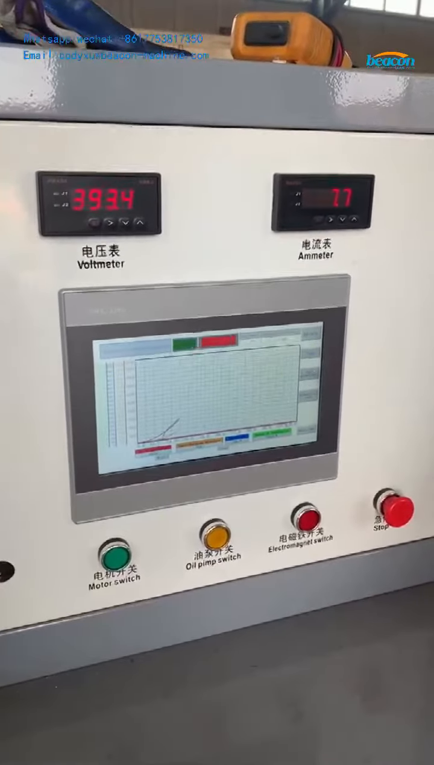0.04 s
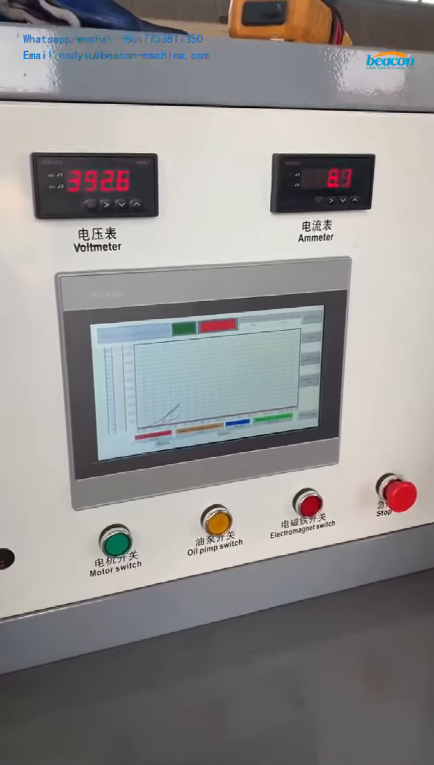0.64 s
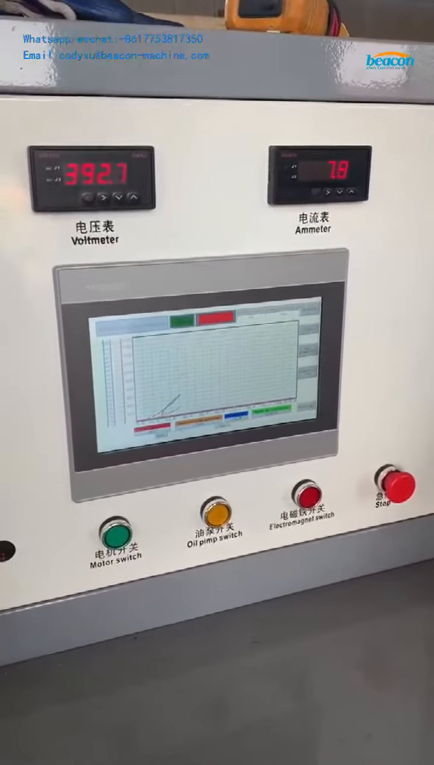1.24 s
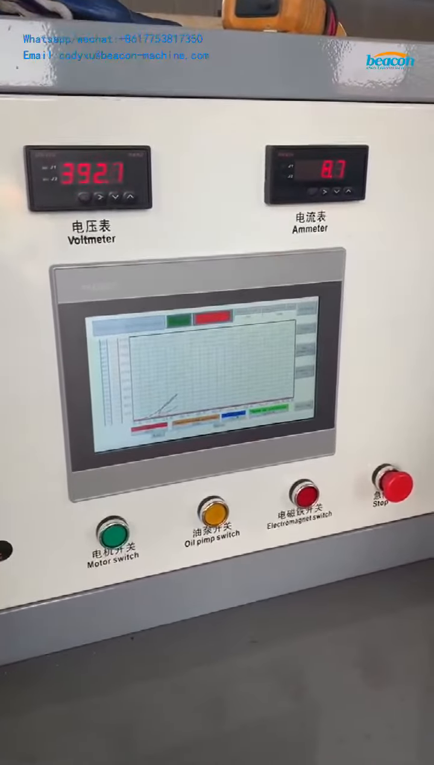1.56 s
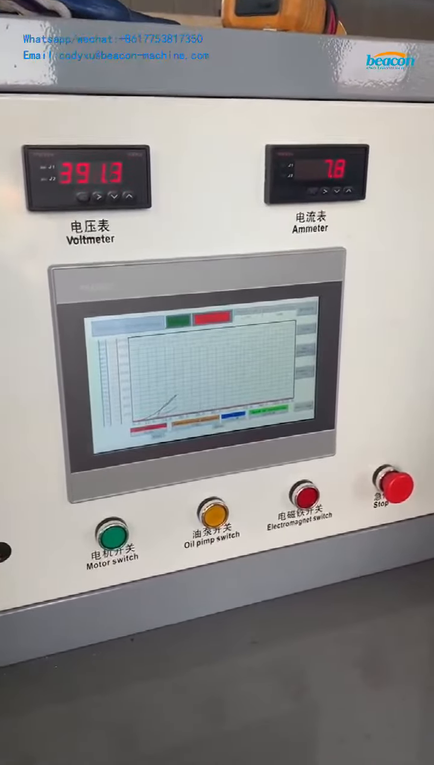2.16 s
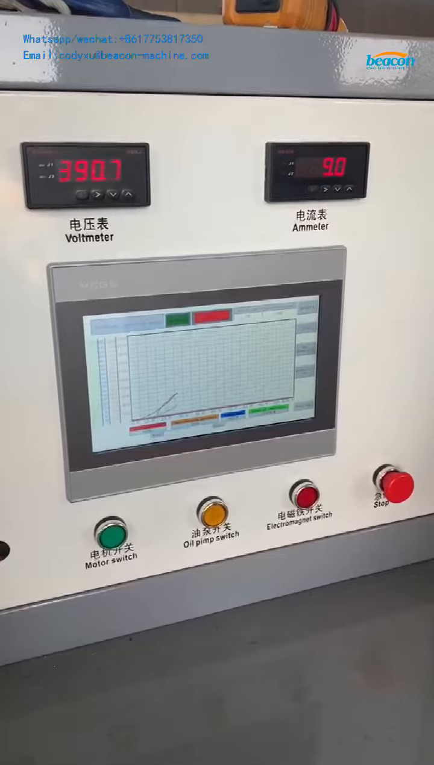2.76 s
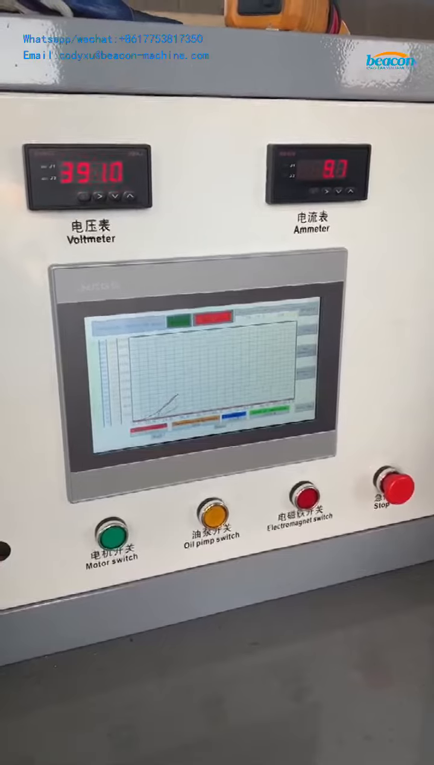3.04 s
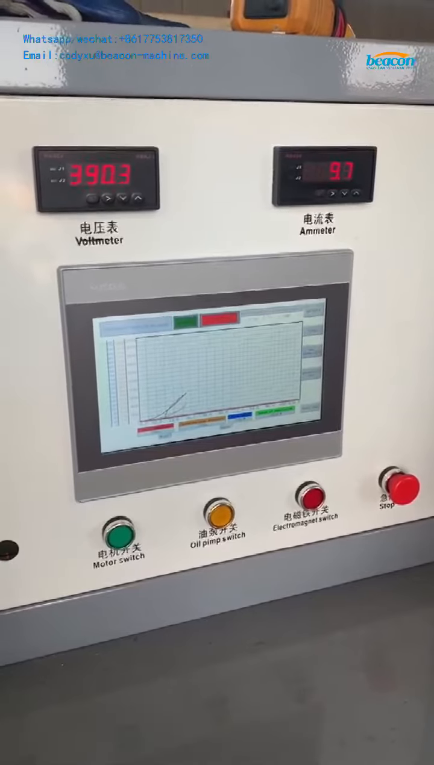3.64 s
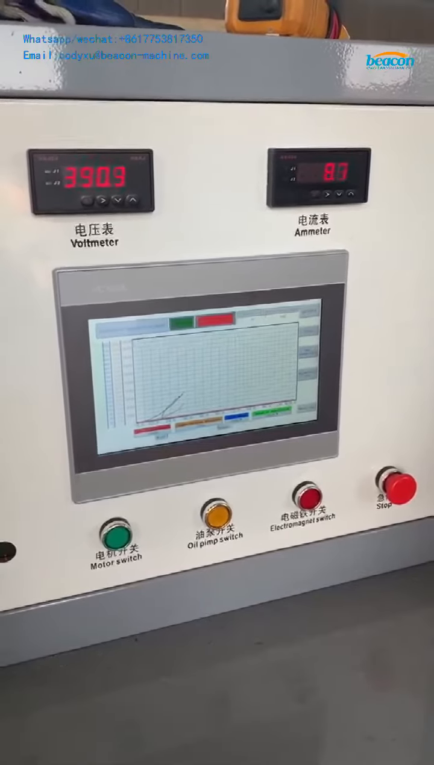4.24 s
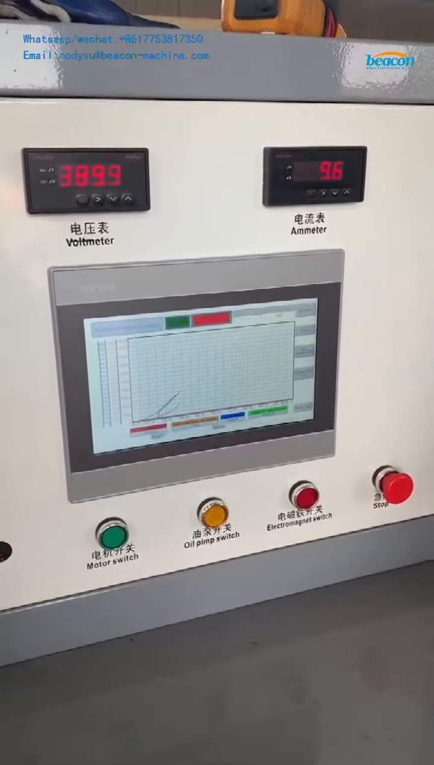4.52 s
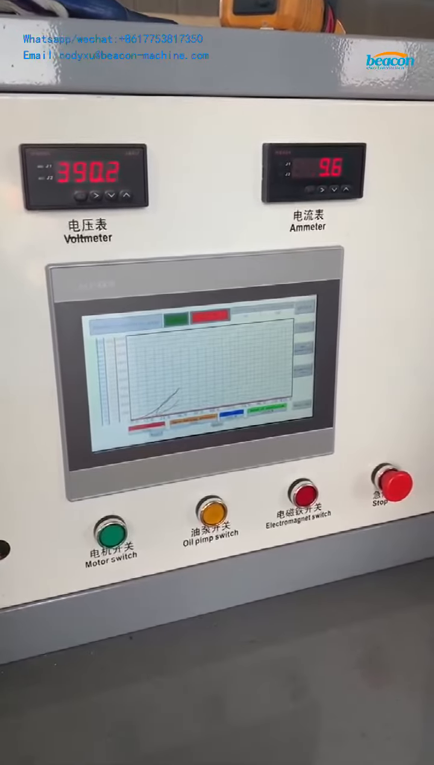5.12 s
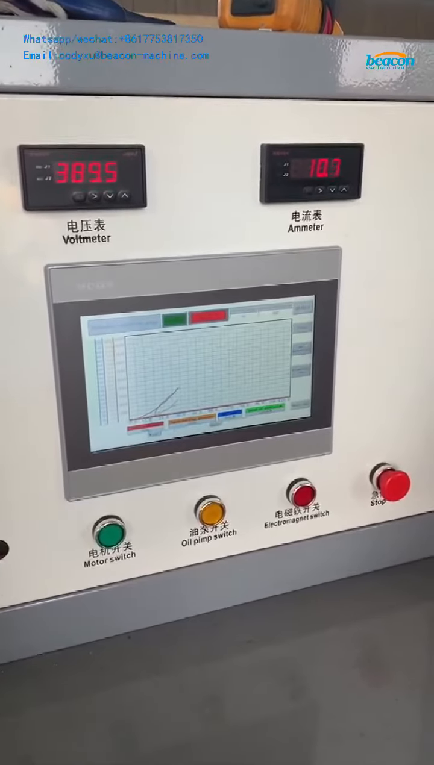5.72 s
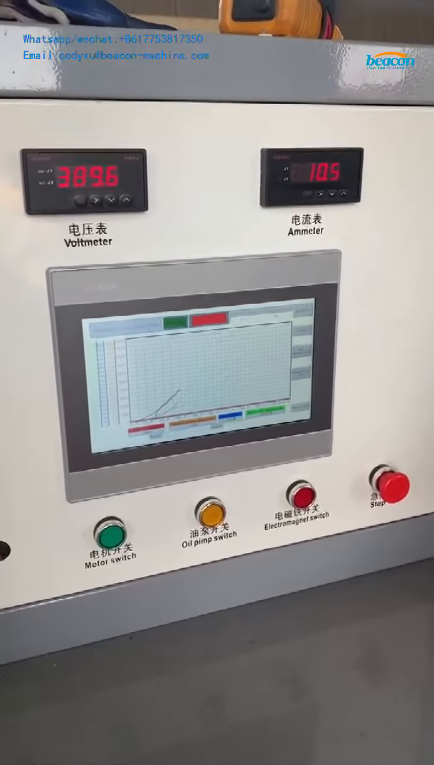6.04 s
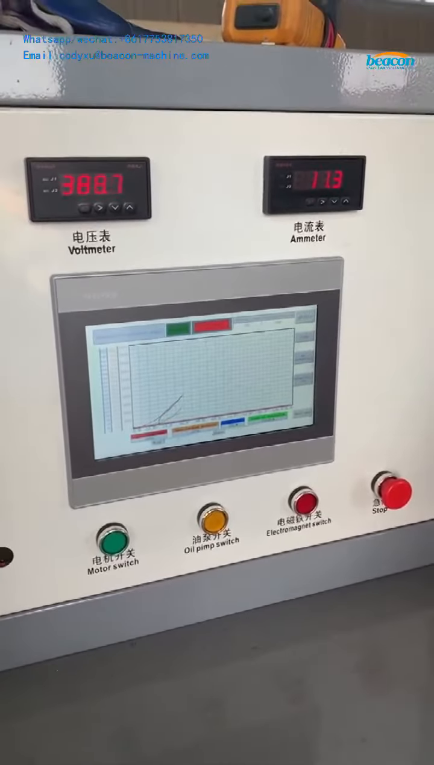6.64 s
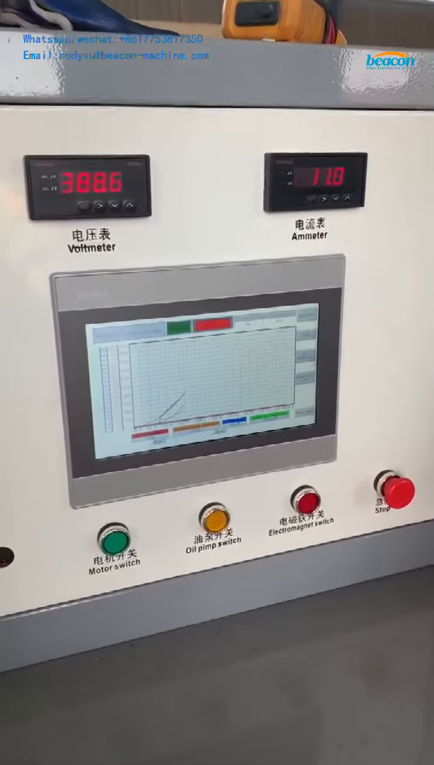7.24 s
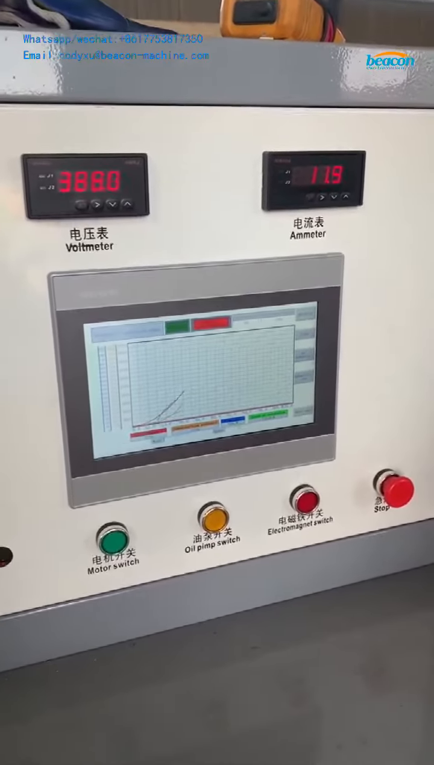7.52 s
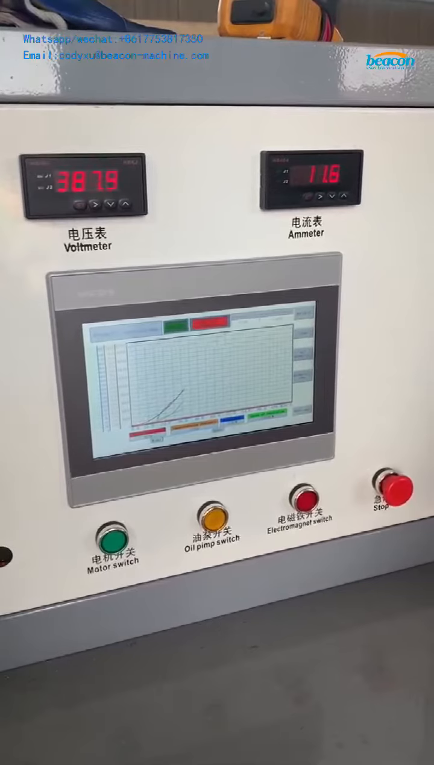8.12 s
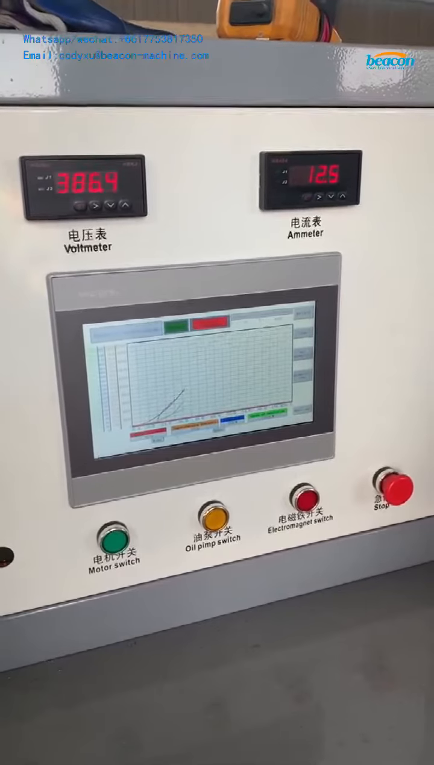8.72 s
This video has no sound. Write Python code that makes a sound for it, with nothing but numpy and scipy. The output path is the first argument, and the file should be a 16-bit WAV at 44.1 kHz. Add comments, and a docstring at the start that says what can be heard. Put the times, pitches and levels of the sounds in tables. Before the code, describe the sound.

A turbocharger runs up on a workshop test bench, heard from beside the control panel. Air roars and hisses loudly through ducts throughout, over a low cabinet rumble and the slowly rising hum of a motor and blower. A thin, high whine climbs steadily in pitch, swelling and fading with a little hall reverberation, while the roar eases slightly in the second half.

```python
"""A turbocharger runs up on a workshop test bench, heard from the control panel.
Its unbalanced shaft radiates a steadily climbing whine, whose upper partials reverberate in the hall.
Turbulent air, which spins it, roars through resonant ducts and shakes the cabinet panels; the roar
changes colour as the listener steps aside. An electric motor and the blower that it drives to supply
the air hum at two rising frequencies and beat against each other."""
import sys
import numpy as np
from scipy import signal
from scipy.fft import rfft, irfft
from scipy.io import wavfile

SR = 44100
rng = np.random.default_rng(int(sys.argv[2]) if len(sys.argv) > 2 else 0)


def to_wav(s):
    """Save 16-bit WAV."""
    ch = np.atleast_2d(s).T  # columns
    pcm = np.round(np.clip(ch, -1, 1) * 32767)  # PCM
    wavfile.write(sys.argv[1], SR, pcm.astype(np.int16))


N = 386757
TIME = np.arange(N) / SR
HZ = np.fft.rfftfreq(N, 1 / SR)

# Strength of the air flow. Each row: time in seconds, level in dB.
FLOW_STRENGTH = [(0, -1.5), (1.9, .5), (3.3, 1.27), (4.45, 1.3), (5.2, -.5), (6.3, 0.5), (7.1, -2),
                 (8.77, -3)]
# Broad spectrum of the hiss as heard, with a deep gap near 12 kHz. Each row: frequency in Hz, spectral density
# in dB.
AIR_SPECTRUM = [(125, -8.5), (270, 1.5), (450, -19), (800, -15.5), (1050, -21.5), (1800, -19), (2650, -41),
                (3800, -33), (5200, -43.5), (6200, -34), (9500, -33.5), (11300, -41.5), (11900, -61),
                (12600, -52), (13200, -46), (14000, -42)]
# Resonances and notches of the ducts and cabinet. Each row: centre in Hz, width in Hz, gain in dB.
DUCT_MODES = [(135, 26, -3.5), (148, 11, 4.5), (184, 14, -1.5), (245, 36, -7), (322, 72, -5), (384, 13, 3),
              (413, 14, -2.5), (546, 49, -5), (571, 60, 5), (662, 40, 12.5), (677, 84, -9), (795, 26, 4),
              (829, 12, -3), (846, 14, 3.5), (880, 30, 4), (928, 55, -5), (1007, 14, 4), (1055, 30, -1.5),
              (1124, 36, 4.5), (1166, 24, 3), (1215, 14, -3), (1248, 12, 3), (1267, 16, -3), (1318, 36, 6),
              (1378, 26, 3.5), (1408, 14, -2.5), (1462, 50, 4.5), (1508, 24, -4), (1585, 70, 8),
              (1702, 86, 4.5), (1828, 29, -2.5), (1926, 56, -10.5), (1952, 161, 12), (2108, 16, -3),
              (2158, 56, 6), (2271, 108, 9.5), (2416, 55, 9), (2518, 42, 9), (2580, 40, -3),
              (2770, 185, 7.5), (2978, 268, 12), (3178, 52, 4.5), (3283, 250, -6), (3336, 60, 4.5),
              (3633, 79, 3), (4089, 50, 4), (4323, 28, 4), (4430, 70, 5), (4840, 70, 6), (5060, 160, -7),
              (7390, 130, 3), (7820, 200, -3), (8560, 130, 3), (9020, 130, -2.5)]
# Blade whistles. Each row: multiple of the shaft frequency, level in dB relative to the outlet's
# air noise before the ducts filter both.
BLADE_HARMONICS = [(4, -26), (5, -20), (6, -16), (7, -12.3), (8, -11.3)]
# The hall's standing waves where the listener starts. Each row: centre in Hz, width in Hz, gain in dB.
START_PLACE_MODES = [(186, 70, -1), (271, 25, 4.5), (385, 62, -6), (660, 56, 5.5), (1110, 62, 0.5),
                     (1320, 77, -5)]
# Rumble of the cabinet panels. Each row: frequency in Hz, spectral density in dB.
PANEL_SPECTRUM = [(8, -18), (25, -2), (38, -1), (50, 10), (68, 9), (82, 16), (92, 16.5), (118, 12),
                  (132, -23), (170, -60)]
# Cabinet peaks and nulls that the hums and fan tone sweep through.
# Each row: centre in Hz, width in Hz, gain in dB.
HUM_MODES = [(60.9, 1.1, -11), (64.2, 0.42, -2), (65.7, 1.6, 4.5), (69.64, 2.5, -8), (71.1, 0.38, -9.5),
             (71.96, 3.4, 7), (77, 8.2, 6), (86.3, 1.4, 5), (90.4, 3.2, -7), (99.2, 9.5, 13.5),
             (102.1, 0.6, 3), (102.5, 0.35, -13), (103.2, 0.6, 2), (106.5, 2.9, -11), (719, 6, 8.5),
             (729, 5, 8), (735.5, 5, 11.5), (741, 3, -6), (753, 9, 15.5), (758.8, 1.5, -16), (761, 4, 12),
             (764.7, 3, 12), (767.8, 3, -7), (879, 10, 8), (914, 35, -10)]
# Response of the motor housing to the slot whine. Each row: centre in Hz, width in Hz, gain in dB.
MOTOR_HOUSING_MODES = [(1852, 11, 10.5), (1916, 14, 11), (2010, 16, 6), (2045, 24, 5), (2080, 30, -10),
                       (2109, 9, 9), (2122, 10, -5)]
# Run-up of the turbocharger. Each row: time in seconds, shaft frequency in Hz.
SHAFT_SPEED = [(0, 1589), (2.4, 1834), (4.3, 2042), (5.5, 2164), (7, 2311), (7.7, 2388), (8.77, 2494)]
# Standing waves that the shaft tone sweeps through. Each row: centre in Hz, width in Hz, gain in dB.
WHINE_MODES = [(1615, 13, 4.5), (1635, 18, -10), (1690, 80, 6.8), (1749, 7, -6), (1797, 20, 5),
               (1838, 8, -5), (1874, 36, 5), (1926, 16, -9), (1968, 100, 12.3), (2060, 24, -7),
               (2112, 20, -19), (2188, 22, 7.5), (2218, 5, -8), (2238, 14, 8.5), (2257, 8, -6),
               (2270, 12, 8), (2281, 6, -17), (2288, 6, 8), (2298, 10, -3), (2364, 36, -18), (2384, 19, 17),
               (2424, 20, 7), (2464, 36, -24), (2491, 15, 10)]
# Upper partials of the shaft. Each row: harmonic number, level in dB relative to the air spectrum.
SHAFT_HARMONICS = [(2, -15), (3, -19), (4, -22.5), (5, -20), (6, -23), (7, -20), (8, -22)]
# Outlet peaks and nulls that those partials sweep through.
# Each row: harmonic number, centre in Hz, width in Hz, gain in dB.
OUTLET_RESONANCES = [(2, 3230, 60, -10), (2, 3345, 150, 7.5), (2, 3520, 50, -6), (2, 3620, 100, 7.8),
                     (2, 3735, 30, -9), (2, 3900, 150, 2), (2, 4240, 90, -13), (2, 4330, 50, 9.5),
                     (2, 4415, 55, 10), (2, 4460, 60, 9), (2, 4572, 50, 10), (2, 4780, 300, -7),
                     (3, 5530, 200, 6), (3, 5880, 120, 7), (3, 6230, 100, 10), (3, 6820, 110, 7),
                     (3, 7300, 500, -4), (4, 6740, 150, 5), (4, 7550, 400, -6), (4, 8200, 150, 4),
                     (4, 8560, 130, 5), (4, 8890, 70, 9), (4, 9150, 70, 11), (4, 9230, 110, 11),
                     (4, 9400, 110, 12), (5, 10350, 250, 3), (5, 11300, 800, 8), (6, 13500, 900, 7),
                     (7, 13500, 900, 2), (8, 13600, 900, 4)]

# Level laws of the noises. Each gives: base level in dB, dB per dB of flow, dB per second of run-up.
BOOM_LAW, ROAR_LAW, PIPE_LAW = (-21, 1, -0.12), (-24, 1.13, -0.039), (-38.5, 1.6, -0.3)
HISS_LAW, PANEL_LAW = (-33.5, 1, 0.15), (-21.5, 0.25, -0.84)
MOTOR_START_HZ, RAMP_HZ_PER_S = 59.42, 1.955
BLOWER_RATIO, FAN_BLADES, SLOT_ORDER = 1.4415, 12, 28.09  # cycles per turn of the motor


def amplitude(db):
    """Amplitude grows tenfold for every 20 dB."""
    return 10 ** (np.asarray(db) / 20)


def curve(table):
    """Linear interpolation gives a timed table's value at every sample."""
    return np.interp(TIME, *np.transpose(table))


def spectrum_db(points, hz=HZ):
    """A spectral envelope in dB, interpolated on a logarithmic frequency axis."""
    point_hz, db = np.transpose(points)
    return np.interp(np.log(hz + 1), np.log(point_hz + 1), db)


def resonance_db(modes, hz):
    """Each mode adds a Lorentzian peak or dip to the response in dB."""
    return sum(db / (1 + (2 * (hz - centre) / width) ** 2) for centre, width, db in modes)


def filtered(x, gain):
    """Filtering multiplies the spectrum by a gain; the result is scaled to rms 1."""
    shaped = irfft(rfft(x) * gain, N)
    return shaped / np.sqrt(np.mean(shaped ** 2) + 1e-20)


def noise(gain):
    """White noise takes on the spectrum of its filter, at rms 1."""
    return filtered(rng.standard_normal(N), gain)


def drift(rate_hz):
    """Low-passed noise gives a slow random fluctuation of rms 1."""
    return noise(np.exp(-(HZ / rate_hz) ** 2) * (HZ > 0))


def rotation(hz):
    """Phase in radians is the integral of frequency, from a random starting angle."""
    return 2 * np.pi * (np.cumsum(hz) / SR + rng.random())


def tone(phase, db):
    """A sinusoid of the given rms level peaks at root two times that amplitude."""
    return np.sqrt(2) * amplitude(db) * np.sin(phase)


def hall(x, t60_s, wet_db):
    """Reverberation adds an exponentially decaying tail, so a rising tone trails its lower past."""
    tail = rng.standard_normal(SR) * amplitude(-60 * TIME[:SR] / t60_s)
    wet = signal.fftconvolve(x, tail / np.linalg.norm(tail))[:N]
    return (x + amplitude(wet_db) * wet) / np.sqrt(1 + amplitude(2 * wet_db))


def flow_db(law):
    """Flow noise follows a power of the flow strength, with a steady trend in dB over the run-up."""
    base_db, flow_exponent, db_per_s = law
    return base_db + flow_exponent * curve(FLOW_STRENGTH) + db_per_s * TIME


def duct_response(echo_db=-6.0):
    """Duct resonances colour the air; interference of early reflections combs the treble finely."""
    delays_s = rng.uniform(.002, .022, 24)
    echoes = sum(np.exp(-2j * np.pi * HZ * delay) for delay in delays_s) / np.sqrt(len(delays_s))
    strength = amplitude(echo_db) * np.minimum(HZ / 5000, 1)
    comb = abs(1 + strength * echoes) / np.hypot(1, strength)
    return amplitude(spectrum_db(AIR_SPECTRUM) + resonance_db(DUCT_MODES, HZ)) * comb


def blade_whistles(wander_hz=1.7):
    """Turbulence and reverberation broaden the upper harmonics of the spinning wheel."""
    shaft = rotation(curve(SHAFT_SPEED) + wander_hz * drift(rate_hz=16))
    return hall(sum(tone(k * shaft, db) for k, db in BLADE_HARMONICS), t60_s=1.4, wet_db=9)


def airflow(crossovers_hz=(130, 450, 2600), pipe_hz=818, pipe_width_hz=140):
    """Duct turbulence radiates broadband noise: boom, roar, a pipe note and hiss with blade whistles."""
    ducts = duct_response()
    low, mid, high = [1 / (1 + (edge / (HZ + 1)) ** 16) for edge in crossovers_hz]  # power high-passes
    boom = noise(ducts * np.sqrt(low * (1 - mid))) * amplitude(flow_db(BOOM_LAW))
    roar = noise(ducts * np.sqrt(mid * (1 - high))) * amplitude(flow_db(ROAR_LAW))
    # The main pipe's broad note stands out when the flow is strongest.
    pipe_band = np.exp(-((HZ - pipe_hz) / pipe_width_hz) ** 2)
    pipe = noise(ducts * pipe_band) * amplitude(flow_db(PIPE_LAW))
    outlet = rng.standard_normal(N) + blade_whistles()
    hiss = filtered(outlet, ducts * np.sqrt(high)) * amplitude(flow_db(HISS_LAW))
    return boom + roar + pipe + hiss


def step_aside(air, from_s=0.25, to_s=2.15):
    """Standing waves make the spectrum depend on position, so the roar changes as the listener moves."""
    at_start = irfft(rfft(air) * amplitude(resonance_db(START_PLACE_MODES, HZ)), N)
    return air + (at_start - air) * np.interp(TIME, [from_s, to_s], [1, 0])


def cabinet_rumble():
    """The flow forces the sheet-metal panels into low-frequency vibration."""
    return noise(amplitude(spectrum_db(PANEL_SPECTRUM))) * amplitude(flow_db(PANEL_LAW))


def motor_and_blower(motor_db=-20, blower_db=-26, fan_db=-44, panel_hz=141, panel_width_hz=4):
    """Rotation is periodic forcing: each machine hums once a turn; fan blades and slots sound higher."""
    motor_hz = MOTOR_START_HZ + RAMP_HZ_PER_S * TIME
    motor = rotation(motor_hz)
    hum = sum(tone(rotation(k * motor_hz), db + resonance_db(HUM_MODES, k * motor_hz))
              for k, db in [(1, motor_db), (BLOWER_RATIO, blower_db), (FAN_BLADES, fan_db)])
    # The motor's octave swells as it passes a panel resonance.
    detuning = 2 * (2 * motor_hz - panel_hz) / panel_width_hz
    octave = tone(2 * motor, db=-34) / np.hypot(1, detuning)
    slot_db = flow_db(ROAR_LAW) - 16 + resonance_db(MOTOR_HOUSING_MODES, SLOT_ORDER * motor_hz)
    slot_whine = hall(tone(SLOT_ORDER * motor, slot_db), t60_s=1, wet_db=-4.5)
    return hum + octave + slot_whine


def turbocharger(base_db=-30, db_per_octave=-14, jitter_hz=0.94, flutter_db=1.7, waver_db=1.5):
    """Shaft unbalance radiates one cycle a turn, with weak harmonics that flutter in the moving air."""
    shaft_hz = curve(SHAFT_SPEED)
    shaft = rotation(shaft_hz + jitter_hz * drift(rate_hz=32))
    whine_db = base_db + db_per_octave * np.log2(shaft_hz / shaft_hz[0])
    whine_db += resonance_db(WHINE_MODES, shaft_hz)
    whine = tone(shaft, whine_db + waver_db * drift(rate_hz=52) + flutter_db * drift(rate_hz=31))
    partials = np.zeros(N)
    for k, db in SHAFT_HARMONICS:
        modes = [mode for harmonic, *mode in OUTLET_RESONANCES if harmonic == k]
        partial_db = db + spectrum_db(AIR_SPECTRUM, k * shaft_hz) + resonance_db(modes, k * shaft_hz)
        flicker_db = waver_db * drift(rate_hz=23) + flutter_db * drift(rate_hz=36)
        partials += tone(k * shaft, partial_db + flicker_db)
    return whine + hall(partials, t60_s=.5, wet_db=-8)


def scene():
    """The sources sound together throughout and add by superposition in one channel."""
    return (step_aside(airflow()) + cabinet_rumble() + motor_and_blower() + turbocharger())[None]


def record(dry):
    """A steep low-pass filter limits the bandwidth."""
    low_pass = signal.firwin(511, cutoff=14170, window=("kaiser", 9), fs=SR)
    return signal.oaconvolve(dry, low_pass[None], "same")


dry = scene()
out = record(dry)
to_wav(out)
```